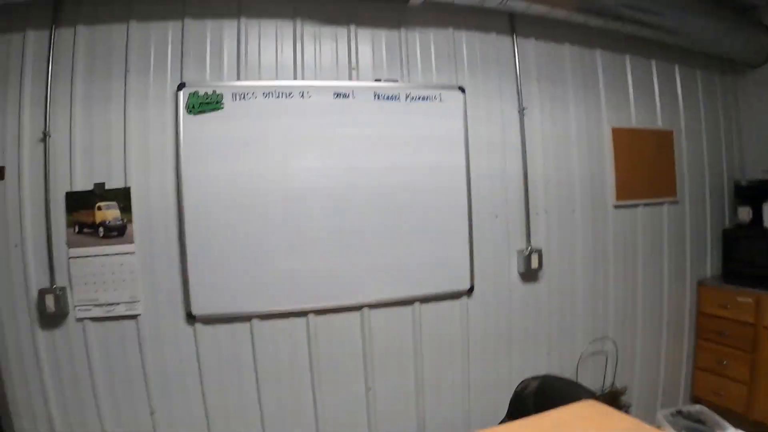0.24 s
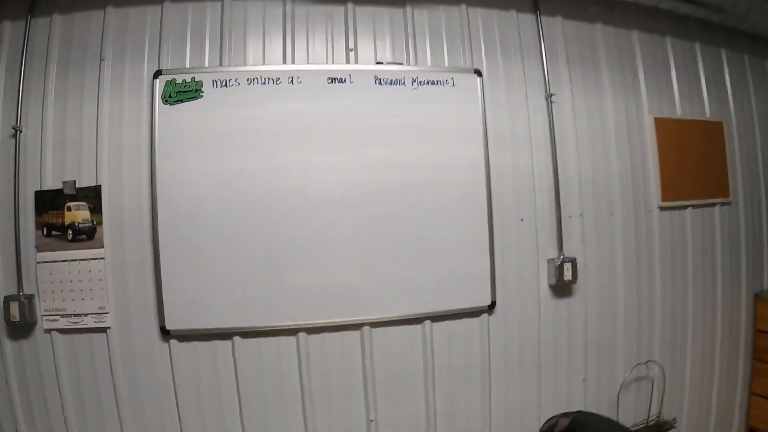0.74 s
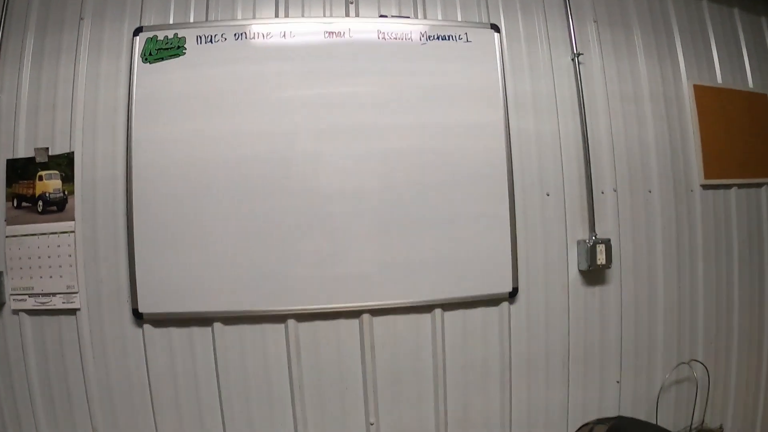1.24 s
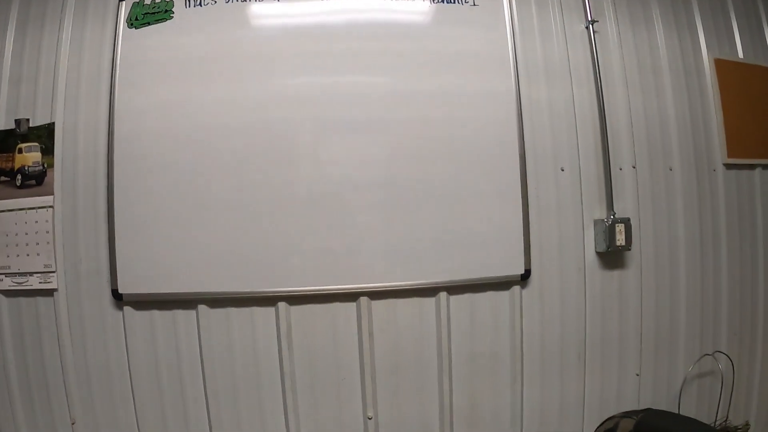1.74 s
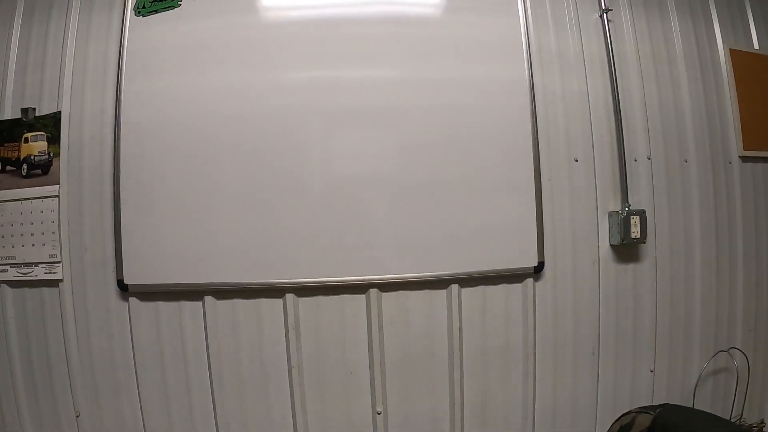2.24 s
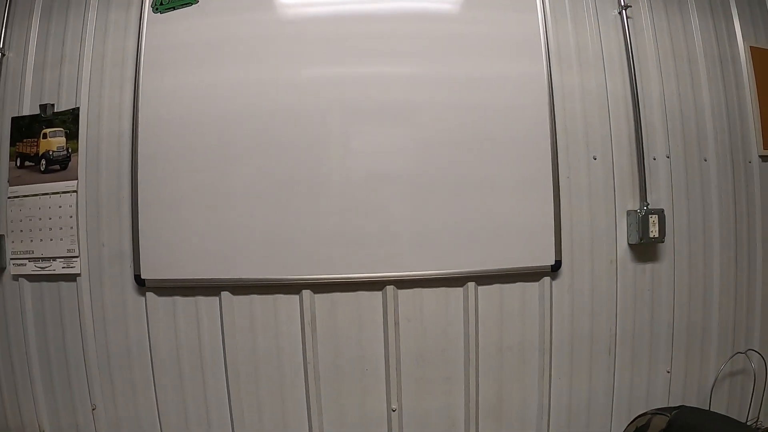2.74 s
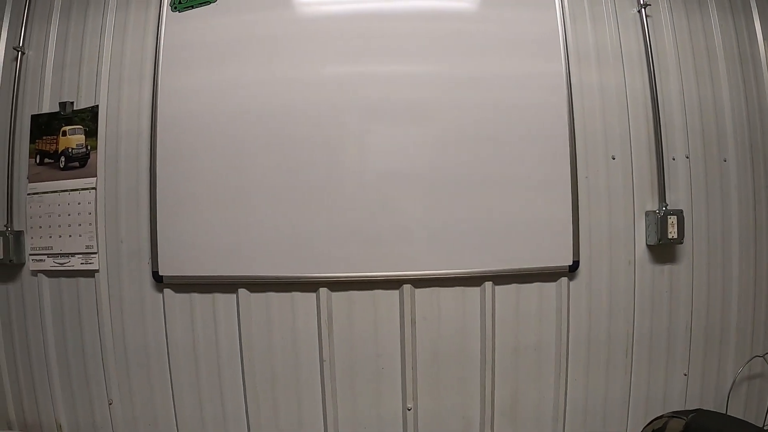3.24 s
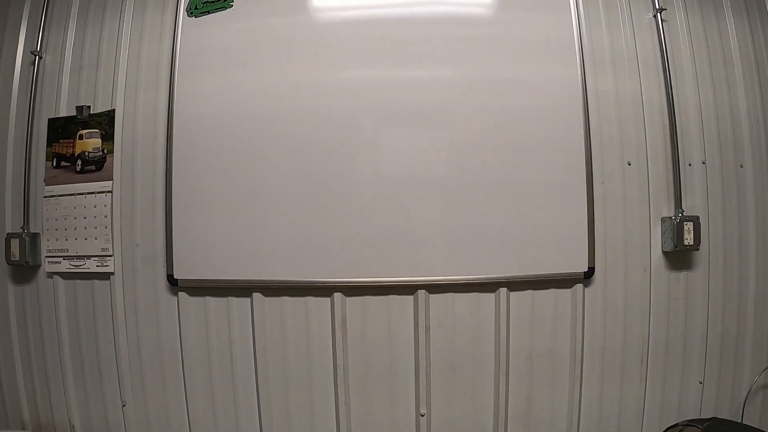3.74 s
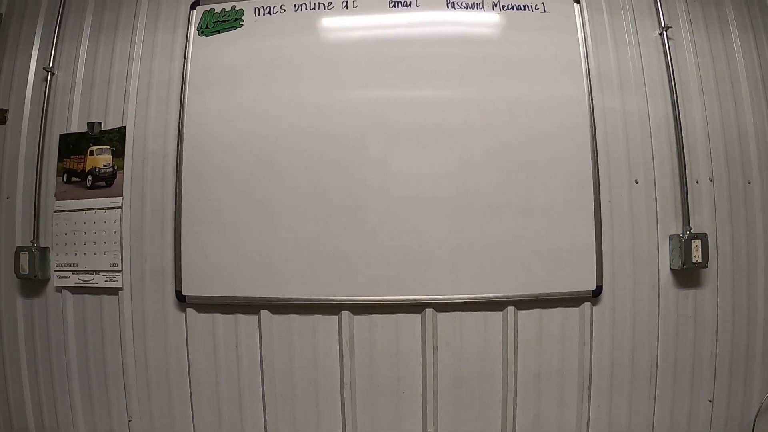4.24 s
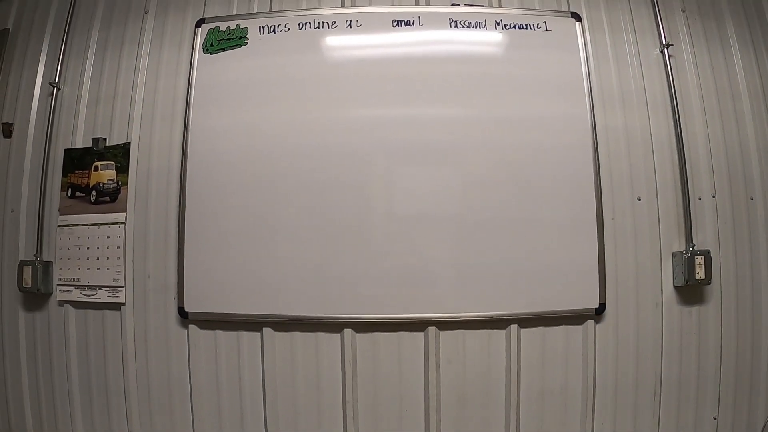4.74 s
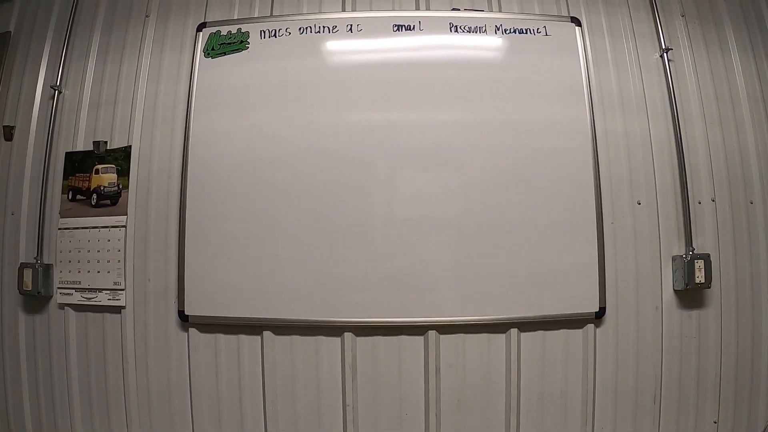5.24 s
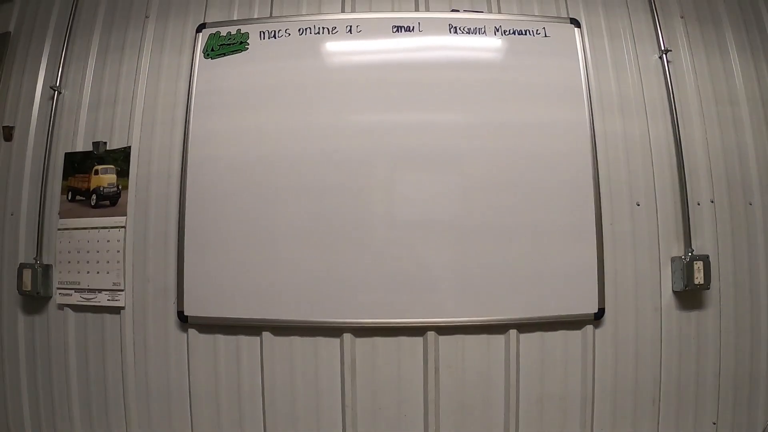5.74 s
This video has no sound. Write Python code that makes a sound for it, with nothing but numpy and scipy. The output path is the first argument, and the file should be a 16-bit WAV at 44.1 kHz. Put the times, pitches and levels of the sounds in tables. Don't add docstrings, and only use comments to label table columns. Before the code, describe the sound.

A distant door slam is already decaying in a metal-walled workshop as fingers shift on a small plastic camera case right at its microphones. Light taps, squeaks and creaks lead to a sharp double slap around two seconds and a softly humming set-down. Near silence follows, then tight, crowded rubbing, ticking and low knocks, ending in heavy thunks.

```python
import sys
import numpy as np
from scipy import signal
from scipy.io import wavfile

SR = 44100
rng = np.random.default_rng(int(sys.argv[2]) if len(sys.argv) > 2 else 0)


def decibels_to_gain(level_db):
    exponent = np.asarray(level_db, float) / 20
    return 10 ** exponent


def pcm_store(signal):
    levels = np.round(np.clip(np.atleast_2d(signal), -1, 1) * 32767)
    wavfile.write(sys.argv[1], SR, levels.astype(np.int16).T)


N = 263718
T = np.arange(N) / SR

# f/Hz, density/dB
SLAM_SPECTRUM = [(36, -2.5), (217, 3), (476, -9.5), (512, -24), (565, -7), (1430, -14.5), (2990, -20.5),
                 (14000, -45)]
# f/Hz, t60/s
SLAM_DECAY = [(60, 1.84), (250, 0.8), (1000, 0.99), (4000, 0.56), (10000, 0.03)]
# f/Hz, density/dB
HUSH_SPECTRUM = [(28, -26), (100, -20), (175, 0), (250, -8), (400, -22), (2500, -28.5), (6500, -27.5),
                 (15500, -53)]
# f/Hz, likeness/1
PORT_LIKENESS = [(40, 0.98), (130, 1), (290, 0.69), (640, 0.88), (1400, 0.9), (3100, 0.61), (7000, 0.26),
                 (15000, 0.19)]

# t/s, level/dB
SUPPORT_LANDING = [
    (2.462, -31.5),
]
# f/Hz, level/dB, t60/s
SUPPORT_MODES = [(105.4, -4.5, 0.64), (240, -5.5, 0.14)]
# start t/s, length/s, level/dB, left-right/dB
AIR_SQUEEZES = [
    (3.165, .012, -63, 0),
    (4.71, 0.024, -35, -6),
    (5.077, 0.022, -30.5, -7),
    (5.408, 0.032, -32.5, -8),
    (5.499, 0.02, -29, -8),
    (5.571, 0.055, -33, -14),
    (5.89, 0.045, -28.5, -12),
]

# f/Hz, width/Hz, level/dB
SHELL_MODES = [(850, 126, -14.5), (1770, 94, -8.5), (2626, 76, -7), (4316, 123, -1), (4980, 310, -12),
               (6320, 250, -14.5), (6950, 114, -17), (8200, 600, -22)]
# f/Hz, width/Hz, level/dB
TIGHT_MODES = [(1810, 100, 3.5), (2880, 200, -1.5), (3194, 750, 3.5), (4900, 230, -6), (6900, 270, -14)]
# f/Hz, width/Hz, level/dB
BODY_MODES = [(116.5, 39, -6.5), (175, 35, 2), (208, 43, 0), (273.5, 88.7, 1), (319, 125, -2.5),
              (407.4, 60, -8)]

# t/s, level/dB
HAND_TREMOR = [(0.2, -38), (0.44, -58), (0.83, -46), (0.92, -65), (1.15, -55), (1.45, -74), (1.7, -70),
               (2.15, -48.5), (2.35, -52), (2.7, -74), (2.75, -96), (3.67, -71), (3.72, -47), (4.05, -50),
               (4.4, -36), (4.62, -41.5), (5.2, -39), (5.8, -41)]
# t/s, load on the hand/dB, slide of the skin/dB
CARRY_LEVELS = [(0.15, -37.5, -54.5), (0.3, -43.5, -55), (0.42, -72, -54.5), (0.5, -46.5, -78),
                (0.7, -59.5, -56), (1.08, -56.5, -67), (1.16, -52, -60), (1.2, -58, -47),
                (1.28, -57.5, -54), (1.5, -46, -52.5), (1.62, -58, -45), (1.82, -60, -46), (1.93, -45, -64),
                (2.06, -38.5, -61), (2.17, -35.5, -75), (2.31, -56.5, -68), (2.71, -49, -63),
                (2.83, -71, -59)]
# start t/s, end t/s, jostle/dB, rub/dB, rustle against rub/dB
CARRY_SCUFFS = [
    (0.433, 0.566, -62, -57.5, -15.5),
    (1.425, 1.513, -60, -56, -29),
    (1.844, 1.872, -69, -59.5, -24.5),
    (1.988, 2.087, -47, -56.5, -11),
    (2.065, 2.141, -53, -49, -22.5),
    (2.19, 2.285, -60, -60.5, -10.5),
    (2.303, 2.363, -62, -60, -7),
    (2.481, 2.488, -38.5, -59, -8),
    (0.719, 0.747, -49, -52, -5),
]
# start t/s, end t/s, jostle/dB, rub/dB, rustle against rub/dB
GRIP_STROKES = [(3.697, 3.805, -49, -73.5, 3.5), (3.807, 3.859, -28, -58.5, -11.5),
                (3.879, 4, -28.5, -60, -21), (3.919, 3.926, -31, -52.5, -20), (3.958, 3.964, -34, -55, -18),
                (4.042, 4.088, -37, -54.5, -12.5), (4.122, 4.182, -33.5, -58, -18),
                (4.175, 4.226, -26.5, -47, -33), (4.265, 4.327, -37.5, -67, -26),
                (4.454, 4.5, -38.5, -60.5, -14.5), (4.543, 4.608, -35, -62.5, -18),
                (4.653, 4.659, -21, -54, -20), (4.742, 4.805, -27.5, -48.5, -26.5),
                (4.825, 4.918, -28.5, -55, -22), (4.902, 4.996, -34, -57.5, -7.5),
                (4.99, 5.056, -31, -59.5, -11), (5.097, 5.128, -31, -50.5, -17),
                (5.182, 5.229, -29, -55.5, -15), (5.032, 5.157, -42, -59.5, -16.5),
                (5.365, 5.38, -45, -55, -17), (5.242, 5.289, -40, -58, -10.5),
                (5.322, 5.387, -35, -65, -15), (5.399, 5.477, -33, -51, -18.5),
                (5.484, 5.59, -30, -59.5, -19), (5.62, 5.661, -31, -62, -27),
                (5.707, 5.783, -26.5, -56.5, -48), (5.76, 5.864, -40, -59.5, -32.5),
                (5.822, 5.869, -32, -57.5, -37), (5.918, 5.995, -32, -60, -24.5)]
RESET_S = 3.697

# f/Hz, density/dB
SLIDE_SPECTRUM = [(650, -30), (1100, -11), (1700, -3.5), (2600, 0), (3300, -1), (4200, -8), (6500, -24),
                  (8500, -45)]
# f/Hz, density/dB
RUSTLE_SPECTRUM = [(1760, -9.5), (3000, -9), (4660, 14.5), (7430, 5), (8880, -0.5), (12900, -19),
                   (15500, -3)]
# start t/s, end t/s, level/dB
SQUEAK_SPELLS = [
    [(.635, .69, -61), (.714, .762, -42.5), (.76, .812, -53.5), (.84, .925, -63.5), (.955, 1.015, -55.5),
     (1.035, 1.088, -52), (1.43, 1.52, -53.5), (1.49, 1.605, -51.5)],
    [(4.05, 4.115, -53.5), (4.138, 4.175, -57.5)],
]
# start t/s, length/s, level/dB, f/Hz
SHELL_CREAKS = [(0.341, 0.021, -52, 1970), (0.404, 0.032, -51, 1880), (0.493, 0.015, -33.5, 860),
                (0.515, 0.023, -46.5, 850), (0.548, 0.02, -52, 1090), (0.707, 0.034, -43.5, 920),
                (0.741, 0.055, -47.5, 850), (0.864, 0.032, -50, 1770), (0.904, 0.04, -52.5, 1830),
                (1.859, 0.015, -48, 860), (1.872, 0.014, -44.5, 850), (2.051, 0.067, -42.5, 810),
                (2.118, .025, -45, 930), (2.147, 0.035, -52, 2050), (2.195, 0.023, -55, 850),
                (2.321, 0.084, -54, 950), (2.336, 0.04, -61, 2580), (2.468, 0.01, -45.5, 590),
                (2.471, 0.036, -53, 850), (3.817, 0.016, -63, 1180), (3.847, 0.017, -44, 850),
                (3.896, 0.023, -45.5, 996), (3.929, 0.0096, -45, 800), (4.138, 0.037, -43, 760),
                (4.186, 0.054, -38.5, 930), (4.601, 0.019, -55, 850), (4.66, 0.011, -69, 2030),
                (4.808, 0.031, -51, 900), (4.87, .016, -39.5, 750), (4.971, 0.012, -44, 840),
                (5.005, 0.055, -44, 430), (5.167, 0.022, -44, 600), (5.201, 0.0113, -38, 1540),
                (5.523, 0.022, -55, 960), (5.627, 0.028, -45, 680), (5.76, 0.053, -46.5, 1110),
                (5.8, 0.07, -56, 1050), (5.849, 0.023, -48, 700)]
# t/s, level/dB, left-right/dB
SKIN_SPECKS = [(3.028, -52, 11), (3.7214, -37.5, -2), (4.123, -54, 6), (4.285, -41, 4), (4.431, -47, 4.5),
               (4.495, -39.5, 13), (5.0394, -39, 7), (5.0564, -42, 3), (5.0634, -39, 4), (5.076, -40, 12),
               (5.1806, -38.5, -3), (5.2174, -27, 4), (5.2494, -48, 2.5), (5.294, -43, 9),
               (5.3398, -43.5, 8), (5.383, -43.5, 1), (5.7064, -48.5, -3), (5.7172, -50, 1.5),
               (5.8564, -46, -1), (5.8661, -49, 7)]

# t/s, level/dB, level near 1 kHz/dB, left-right/dB
CARRY_TAPS = [
    (0.219, -34, -37, -3.5),
    (0.4935, -40, -33, -13),
    (0.561, -56, -40, -14),
    (0.641, -43.5, -41.5, -7),
    (1.1043, -26, -31.5, 1),
    (2.0745, -44, -24, -2),
    (2.0826, -36.5, -40, 10),
    (2.2356, -44.5, -46.5, 5),
    (2.4637, -57, -41.5, -13),
    (2.661, -43.5, -43.5, 19.5),
]
TAP_PITCH = [2040, 2140, 900, 2380, 4200, 1570, 2330, 1930, 1500, 3800]
# t/s, level/dB, level near 1 kHz/dB, left-right/dB
GRIP_TICKS = [(3.8022, -31, -69, -18.5), (3.843, -32, -67, -8.5), (3.892, -42, -36.5, -5),
              (4.0981, -60, -28, -9), (4.182, -56, -36.5, 17), (4.2985, -35, -34, -2),
              (4.374, -49, -41.5, -1), (4.3931, -45.5, -41.5, 6), (4.4597, -43, -57, 5),
              (4.5094, -55.5, -57, 34.5), (4.547, -44, -42, -6), (4.6148, -44.5, -65, 8),
              (4.649, -38, -70, 5), (4.673, -41.5, -39, 4), (4.9019, -36.5, -32, 5), (4.927, -21, -23, 3),
              (4.972, -45, -45, 9), (5.0036, -41, -59, 11), (5.1289, -32, -37, 4), (5.173, -42, -49, 4),
              (5.2004, -40.5, -45, 9), (5.2313, -31, -65, 3), (5.4056, -23.5, -18.5, 3.5),
              (5.4371, -33, -33.5, 9), (5.496, -35, -30.5, 7), (5.5877, -45.5, -40.5, 7),
              (5.6349, -50, -37.5, 12), (5.7343, -26, -9.5, -13), (5.7381, -26, -26, 8),
              (5.9682, -34.5, -23.5, -12)]
TICK_PITCH = [4770, 7500, 7100, 2620, 1920, 1570, 1750, 1530, 1620, 5570, 1760, 3200, 6000, 3330, 2480,
              3200, 2980, 3450, 6360, 2840, 1610, 3260, 1760, 2190, 6900, 2490, 3500, 4500, 1800, 1570]
# t/s, level/dB, f/Hz, left-right/dB
SHELL_SLAPS = [
    (2.075, -16, 850, -3.5),
    (2.0829, -17, 850, -1),
    (5.406, -17, 655, 6),
    (5.4375, -25.5, 1310, 8),
    (5.734, -14.5, 790, -13.5),
    (5.7388, -8, 410, -8),
    (5.966, -22, 650, 9),
]

# crest t/s, level/dB, f/Hz, t60/s, left-right/dB
HEAVY_THUNKS = [
    (0.484, -24, 89, 0.052, 3),
    (1.5, -45, 189, 0.13, -6),
    (2.077, -17, 277, 0.067, -0.5),
    (2.0855, -13, 272, 0.023, 2),
    (3.17, -46.5, 172, 0.095, 4),
    (5.727, -18.5, 167, 0.033, 3),
    (5.7397, -10, 120, 0.017, -13.5),
    (5.777, -28, 270, 0.033, 2),
    (5.9705, -14, 100, 0.069, -9.5),
]
# crest t/s, level/dB, f/Hz, t60/s
CARRY_BUMPS = [(0.735, -40, 175, 0.14), (0.799, -39, 122, 0.014), (1.004, -40.5, 151, 0.025),
               (1.109, -32.5, 169, 0.043), (1.902, -31, 150, 0.018), (1.987, -38, 144, 0.063),
               (2.006, -31, 127, 0.12), (2.133, -26.5, 185, 0.078), (2.203, -30, 134, 0.039),
               (2.24, -35, 125, 0.19), (2.286, -35, 112, 0.048), (2.334, -32.5, 186, 0.017),
               (2.389, -31.5, 211, 0.04), (2.47, -31, 223, 0.014), (2.53, -51, 240, 0.056),
               (2.602, -58, 220, 0.031)]
# crest t/s, level/dB, f/Hz, t60/s
GRIP_KNOCKS = [(3.712, -36, 143, 0.044), (3.751, -37.5, 166, 0.061), (3.827, -23, 168, 0.02),
               (3.838, -22, 184, 0.037), (3.851, -26.5, 170, 0.055), (3.867, -35, 305, .03),
               (3.896, -23.5, 175, 0.22), (5.7465, -8.5, 279, 0.024), (3.901, -35.5, 341, 0.12),
               (5.443, -30, 198, 0.051), (3.945, -47, 366, 0.04), (5.9725, -14.5, 238, 0.025),
               (3.931, -23.5, 246, 0.026), (3.964, -28.5, 254, 0.023), (3.993, -24, 212, 0.022),
               (4.102, -21, 215, 0.037), (4.123, -20.5, 200, 0.044), (4.187, -17, 219, 0.035),
               (4.212, -23.5, 240, 0.0091), (4.225, -21.5, 222, 0.12), (4.305, -13.5, 208, 0.031),
               (4.398, -24, 228, 0.04), (4.464, -24.5, 160, 0.027), (4.576, -23.5, 118, 0.028),
               (4.677, -20, 232, 0.054), (4.756, -20.5, 240, 0.029), (4.771, -27.5, 256, 0.067),
               (4.799, -32, 253, 0.023), (4.89, -24, 278, 0.02), (4.974, -24.5, 242, 0.032),
               (5.017, -31, 168, 0.063), (5.032, -25.5, 213, .05), (5.093, -23.5, 208, 0.18),
               (5.119, -34, 151, 0.015), (5.127, -21, 127, 0.016), (5.177, -21.5, 120, 0.031),
               (5.201, -23.5, 128, 0.023), (5.22, -22, 228, 0.019), (5.377, -20, 131, 0.036),
               (5.449, -21, 194, 0.016), (5.637, -28, 269, 0.058), (5.656, -34, 223, 0.03),
               (5.862, -28.5, 247, 0.042), (4.233, -23, 240, 0.014), (5.742, -10.5, 293, 0.022),
               (5.796, -34, 391, 0.084)]
# t/s, left-right/dB
HAND_LEAN = [(0.7, -7), (2.0, 0.5), (4.24, 1.5), (4.47, -14), (4.66, -0.5), (5.05, 4), (5.17, -2),
             (5.6, -4)]


def rms_one(x):
    return x / np.sqrt(np.mean(x ** 2) + 1e-20)


def in_time(rows):
    s, *columns = np.transpose(rows)
    return [np.interp(T, s, c) for c in columns]


def at_hz(points, hz):
    table = np.array(points)
    return np.interp(np.log(hz), np.log(table[:, 0]), table[:, 1])


def sides(pan_db):
    return decibels_to_gain(np.multiply.outer([.5, -.5], pan_db))


def swell(t, length):
    return np.sin(np.pi * np.clip(t / length, 0, 1))


def band(x, low_hz, high_hz):
    sos = signal.butter(2, [low_hz, min(high_hz, .45 * SR)], "band", fs=SR, output="sos")
    return signal.sosfilt(sos, x)


def drift(rate):
    r = np.exp(-80 * np.pi * rate / SR)
    slow = signal.lfilter([1], [1, -2 * r, r * r], rng.standard_normal(N // 40 + 2002))[2000:]
    return np.interp(np.arange(N) / 40, np.arange(len(slow)), rms_one(slow))


def resonances(x, modes):
    out = 0
    for k, (hz, width, db) in enumerate(modes):
        r = np.exp(-np.pi * width / SR)
        poles = [1, -2 * r * np.cos(2 * np.pi * hz / SR), r * r]
        out = out + (-1) ** k * decibels_to_gain(db) * signal.lfilter([1 - r * r, 0, r * r - 1], poles, x)
    return out


def grains(per_s, spread_db, alike):
    chance = rng.random((3, N)) * SR / per_s
    hit = chance < 1
    clicks = np.full((3, N), 1e-18)
    clicks[hit] = decibels_to_gain(spread_db * np.minimum(-np.log(chance[hit] + 1e-12), 5))
    clicks = clicks * (-1) ** np.arange(N)
    alike = np.clip(alike, 0, 1)
    return np.sqrt(alike) * clicks[0] + np.sqrt(1 - alike) * clicks[1:]


def banded_noise(spectrum, patchy_db, t60=None):
    out, power = 0, 0
    edges = 22 * 2 ** np.arange(0, 9.6, .5)
    white = rng.standard_normal((2, 2, N))
    for k, (low, high) in enumerate(zip(edges, edges[1:])):
        hz = np.sqrt(low * high)
        if not spectrum[0][0] * .8 < hz < spectrum[-1][0] * 1.2:
            continue
        mid, side = band(white[k % 2], low, high)
        alike = np.clip(at_hz(PORT_LIKENESS, hz), -1, 1)
        stereo = np.sqrt(1 + alike) * mid + np.sqrt(1 - alike) * side * [[1], [-1]]
        part = decibels_to_gain(at_hz(spectrum, hz) + patchy_db * drift(37.0)) * stereo
        power += np.mean(part ** 2)
        out = out + part * (decibels_to_gain(-60 * T / at_hz(t60, hz)) if t60 else 1)
    return out / np.sqrt(power)


def add(out, s, sound):
    i = round(s * SR)
    out[:, i:i + sound.shape[1]] += sound[:, :N - i]


def late_left(x):
    return np.array([np.roll(x[0], 5), x[1]])


def room():
    hush = banded_noise(HUSH_SPECTRUM, patchy_db=.8)
    slam = banded_noise(SLAM_SPECTRUM, patchy_db=-1.8, t60=SLAM_DECAY)
    return decibels_to_gain(-23.5) * slam + decibels_to_gain(-67) * hush


def support():
    out, t = np.zeros((2, N)), np.arange(SR) / SR
    for s, db in SUPPORT_LANDING:
        hum = 0
        for hz, level_db, t60 in SUPPORT_MODES:
            level = decibels_to_gain(db + level_db - 60 * t / t60 + 2.0 * drift(11)[:SR])
            hum = hum + level * np.sin(2 * np.pi * hz * t)
        stilled = decibels_to_gain(-400 * np.maximum(t - .24, 0))
        add(out, s, sides(-6.5)[:, None] * hum * (1 - np.exp(-t / 0.0065)) * stilled)
    return out


def squeezes():
    out, t = np.zeros((2, N)), np.arange(SR) / SR
    for s, length, db, pan_db in AIR_SQUEEZES:
        add(out, s, sides(pan_db)[:, None] * decibels_to_gain(db) * swell(t, length) ** 2)
    return out


def shake():
    level_db = in_time(HAND_TREMOR)[0]
    rise_s, t60_s = 0.017, 0.04
    for s, db, *_ in HEAVY_THUNKS:
        lump_db = db - 11.5 - 60 * np.maximum((T - s) / t60_s, (s - T) / rise_s)
        level_db = np.maximum(level_db, lump_db)
    return decibels_to_gain(level_db)


def grip(jostle_db):
    rumble = rms_one(band(grains(per_s=240.0, spread_db=3.0, alike=0.41), 22.0, 85.0))
    jolts = band(grains(per_s=260.0, spread_db=3.0, alike=0.81), 71, 415)
    unmasked = np.clip((T - .1) / .15, 0, 1)
    rumble = sides(-2.5)[:, None] * (shake() + decibels_to_gain(jostle_db - 19.5)) * rumble
    return unmasked * (rumble + decibels_to_gain(jostle_db - 5.5) * rms_one(resonances(jolts, BODY_MODES)))


def contact():
    load_db, slide_db = in_time(CARRY_LEVELS)
    rest_db = -147 * np.maximum(T - 2.72, 0)
    palm_db = -64.5 + 0.11 * (load_db + 76.0) + rest_db - 40 * np.maximum(T - 2.45, 0)
    rustle_db = -74.5 + 0.29 * (slide_db + 65.0) + 0.51 * rest_db
    levels = np.array([load_db + 0.22 * rest_db, palm_db, slide_db + rest_db, rustle_db])
    levels = np.maximum(levels, -110.)
    for start, end, jostle_db, rub_db, rustle_db in CARRY_SCUFFS + GRIP_STROKES:
        slide_db = rub_db + 5.5 + 0.44 * rustle_db
        db = [jostle_db, rub_db, slide_db, rub_db + rustle_db]
        span = slice(round(start * SR), round((end + .15) * SR))
        age = T[span] - start
        shape_db = -30 * np.exp(-age / 0.0037) + 0.5 - 25 * age - 450 * np.maximum(T[span] - end, 0)
        levels[:, span] = np.maximum(levels[:, span], np.add.outer(db, shape_db))
    return levels


def creaks():
    out, t = np.zeros((2, N)), np.arange(4000) / SR
    noises = rng.standard_normal((len(SHELL_CREAKS), 2, len(t)))
    for (s, length, db, hz), noise in zip(SHELL_CREAKS, noises):
        puff = (noise[0] + 0.63 * noise) * swell(t, length) ** 0.55
        tone = resonances(puff, [(hz, hz / 6, 0)])
        tone = resonances(tone, [(hz, 1.5 * hz / 6, 0)])
        add(out, s - 3.84 / hz, decibels_to_gain(db) * tone / np.abs(tone).max())
    return out


def specks():
    out, t = np.zeros((2, N)), np.arange(600) / SR
    snaps = band(rng.standard_normal((len(SKIN_SPECKS), 2, 600)) * decibels_to_gain(-60 * t / 0.0054), 2200, 6700)
    for (s, db, pan_db), snap in zip(SKIN_SPECKS, snaps):
        add(out, s, sides(pan_db)[:, None] * decibels_to_gain(db - 4) * snap / np.abs(snap).max())
    return out


def squeak():
    out, slips = 0, grains(per_s=5900.0, spread_db=2.5, alike=0.26)
    for spell, detune in zip(SQUEAK_SPELLS, (1, .948)):
        level = sum(decibels_to_gain(db) * swell(T - start, end - start) ** 0.56 for start, end, db in spell)
        shell = [(hz * detune, width, db) for hz, width, db in SHELL_MODES]
        strongest = [(SHELL_MODES[3][0] * detune, 87, 0)]
        whistle = resonances(resonances(slips, strongest), strongest)
        ringing = rms_one(resonances(slips, shell)) + rms_one(whistle)
        out = out + level * decibels_to_gain(2.0 * drift(27)) * ringing
    return out


def hollow_scrape(tight):
    scrape = grains(per_s=1200.0, spread_db=2.8, alike=.7)
    ring = [rms_one(resonances(scrape, [mode])) for mode in SHELL_MODES[:2]]
    lumps = 0
    for hz in np.geomspace(560, 1700, 5):
        lumps = lumps + decibels_to_gain(19.4 * drift(13.0)) * resonances(scrape, [(hz, hz * 0.16, 0)]) / np.sqrt(hz)
    dull = 1.095 * rms_one(band(scrape, 310, 1580)) + 0.15 * ring[0] + 0.32 * rms_one(lumps)
    dull = dull + 0.43 * rms_one(band(scrape, 570, 3540)) * tight
    return np.where(tight, late_left(dull), dull), ring[1]


def rub(dull_db, slide_db, bright_db):
    tight = T > RESET_S
    dull, second_mode = hollow_scrape(tight)
    loose = np.interp(T, [.3, .4, 1.1, 1.3], [0, 1, 1, 0])
    slide = banded_noise(SLIDE_SPECTRUM, patchy_db=.8) + .5 * loose * decibels_to_gain(5 * drift(8)) * second_mode
    skin = rng.standard_normal(N) + .5 * rng.standard_normal((2, N))
    held = decibels_to_gain(3.0 * drift(6.8)) * rms_one(resonances(skin, TIGHT_MODES))
    slide = (1 - .45 * tight) * slide + .45 * tight * held
    crackle = rms_one(band(grains(per_s=360.0, spread_db=2.0, alike=0.26), 1500, 6400)) * tight
    bright = banded_noise(RUSTLE_SPECTRUM, patchy_db=1.5) + .45 * crackle
    flicker = decibels_to_gain(1.98 * drift(33))
    return flicker * (decibels_to_gain(dull_db - 3.5) * dull + decibels_to_gain(bright_db + 5.0) * bright) + decibels_to_gain(slide_db - 3.5) * slide


def grit(dull_db):
    scrape = grains(per_s=2500.0, spread_db=4.0, alike=0.47)
    patches = 0
    for hz in np.geomspace(950, 4300, 8):
        patches = patches + decibels_to_gain(9.6 * drift(14.0)) * resonances(scrape, [(hz, hz * 0.054, 0)]) / hz ** 1.34
    return decibels_to_gain(dull_db - 5) * late_left(rms_one(patches)) * (T > RESET_S)


def ticks():
    out, t, rows = np.zeros((2, N)), np.arange(4000) / SR, CARRY_TAPS + GRIP_TICKS
    noise = rng.standard_normal((len(rows), 2, len(t)))
    noise = noise * (1 - np.exp(-t / 0.00032)) ** 2
    shared = noise[:, :1] + .5 * noise
    noise = noise[:, :1] + .8 * noise
    lows = band(noise * (decibels_to_gain(-60 * t / 0.0085) + decibels_to_gain(-25.0 - 60 * t / 0.1)), 1600, 6150)
    highs = band(noise * (decibels_to_gain(-60 * t / .005) + decibels_to_gain(-25 - 60 * t / 0.043)), 3500, 20000)
    blows = band(shared * (decibels_to_gain(-60 * t / 0.023) + decibels_to_gain(3.5 - 60 * t / 0.059)), 180, 1800)
    clack = band(shared * decibels_to_gain(-60 * t / 0.025), 1600, 3700)
    first_contact = band(np.arange(len(t)) == 30, 500, 2330)
    bodies = band(blows, 180, 1100) + 0.15 * clack - 0.99 * first_contact
    rings = resonances(blows, SHELL_MODES[:1])
    parts = zip(rows, lows, highs, bodies, rings, TAP_PITCH + TICK_PITCH)
    for (s, db, hollow_db, pan_db), low, high, body, ring, hz in parts:
        low = 1.2 * low + resonances(low, [(hz, 0.21 * hz, 3)]) + 0.44 * resonances(low, TIGHT_MODES)
        hollow = body + ring if s < RESET_S else late_left(body + 0.28 * ring)
        top_db = -60 + 0.54 * (db + 41)
        snap = decibels_to_gain(db) * low / np.abs(low).max() + decibels_to_gain(top_db) * high / np.abs(high).max()
        hollow = decibels_to_gain(hollow_db - 3.5) * hollow / np.abs(hollow).max()
        add(out, s, sides(pan_db)[:, None] * snap + sides(pan_db * 0.62)[:, None] * hollow)
    return out


def slaps():
    out, t = np.zeros((2, N)), np.arange(900) / SR
    for s, db, hz, pan_db in SHELL_SLAPS:
        swing = decibels_to_gain(db + 2.5 - 60 * t * hz / 3.4) * np.sin(2 * np.pi * hz * t)
        add(out, s, -sides(pan_db)[:, None] * swing)
    return out


def knocks():
    out, t = np.zeros((2, N)), np.arange(6000) / SR
    lean = np.transpose(HAND_LEAN)
    rows = HEAVY_THUNKS + [(*row, np.interp(row[0], *lean)) for row in CARRY_BUMPS + GRIP_KNOCKS]
    for (s, db, hz, t60, pan_db), (ratio, share) in zip(rows, rng.random((len(rows), 2))):
        contact_s = 0.0017 * decibels_to_gain(-0.34 * (db + 19))
        fall = decibels_to_gain(-60 * t / max(t60, .01)) * (1 - np.exp(-t / contact_s)) ** 2
        crest = np.argmax(fall) / SR
        phase = 2 * np.pi * hz * (t - crest)
        partner = 0.64 * share * np.cos(phase * (1.094 + 0.656 * ratio))
        body = -fall * (np.cos(phase) + partner)
        add(out, s - crest, sides(pan_db)[:, None] * decibels_to_gain(db) * body / np.abs(body).max())
    return out


def scene():
    jostle_db, *rub_db = contact()
    behind = room() + support() + squeezes() + grip(jostle_db)
    skin = creaks() + specks() + squeak() + rub(*rub_db) + grit(rub_db[0])
    return behind + skin + ticks() + slaps() + knocks()


def top_cut(x):
    return signal.sosfilt(signal.butter(12, 15820, fs=SR, output="sos"), x)


def record(dry):
    mix = 0.95 * np.tanh(dry / 0.76)
    return top_cut(mix)


dry = scene()
out = record(dry)
pcm_store(out)
```